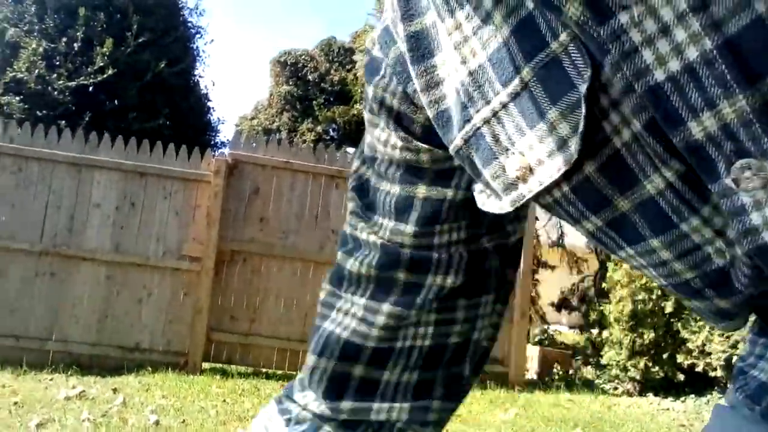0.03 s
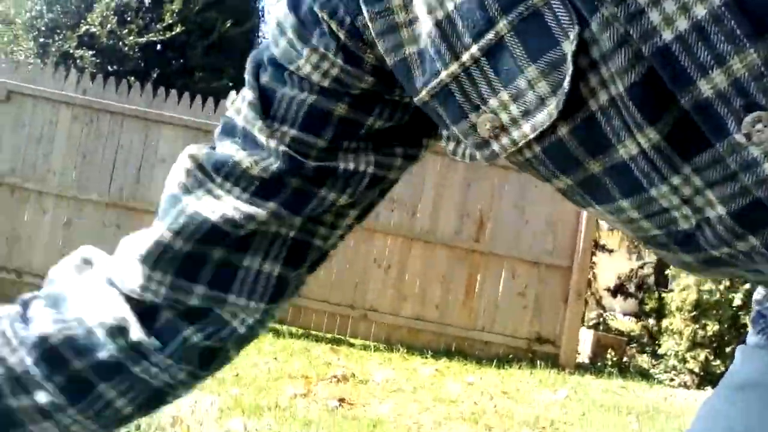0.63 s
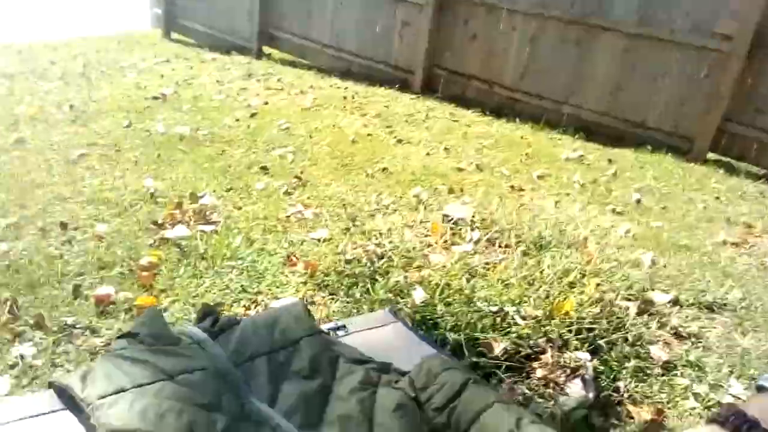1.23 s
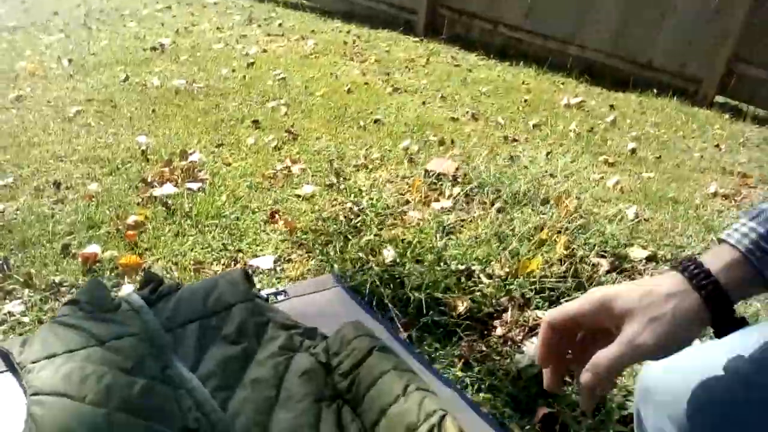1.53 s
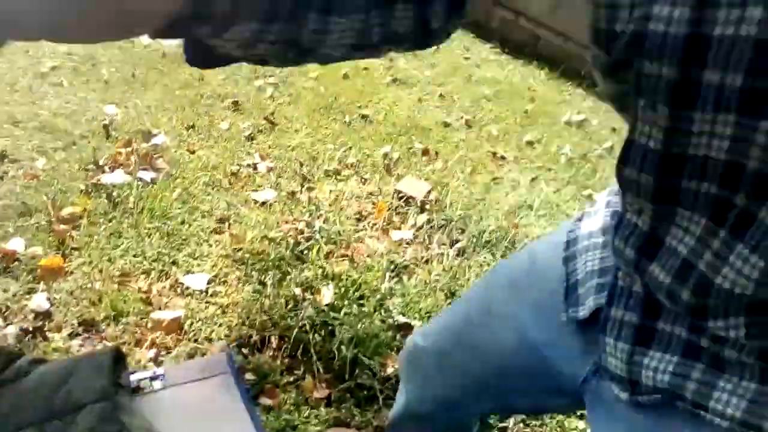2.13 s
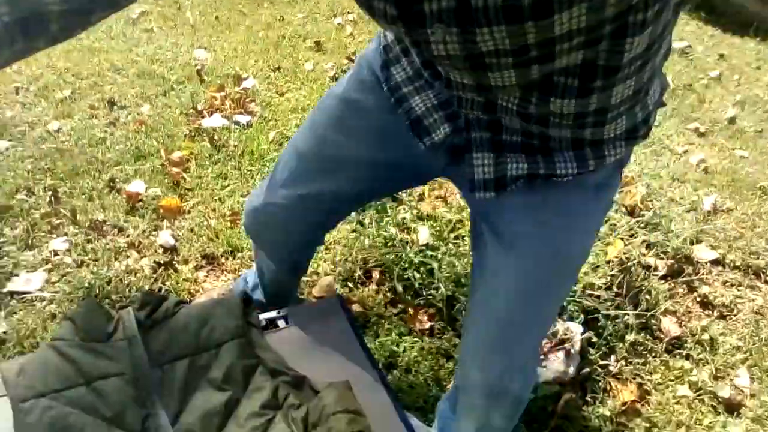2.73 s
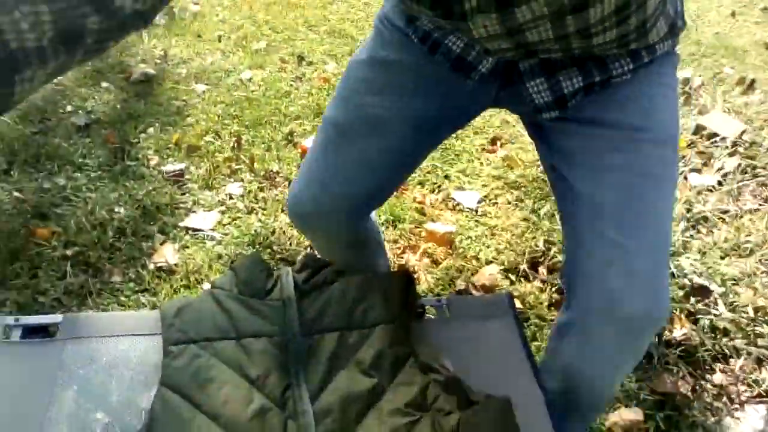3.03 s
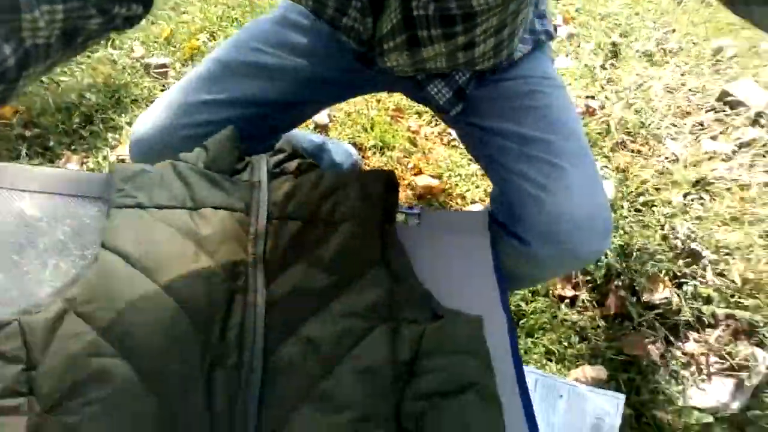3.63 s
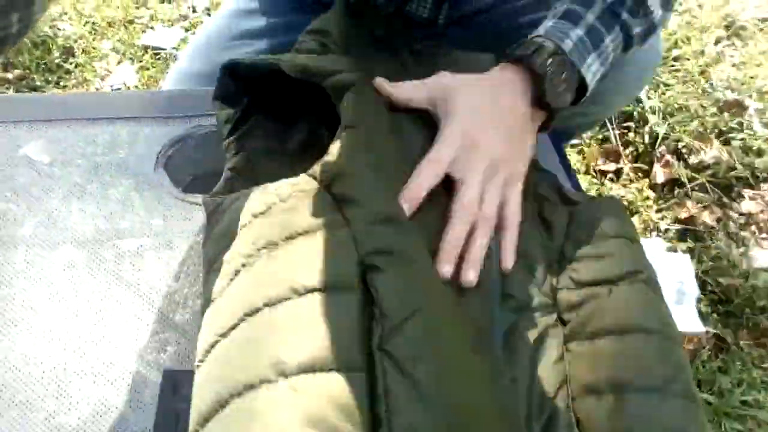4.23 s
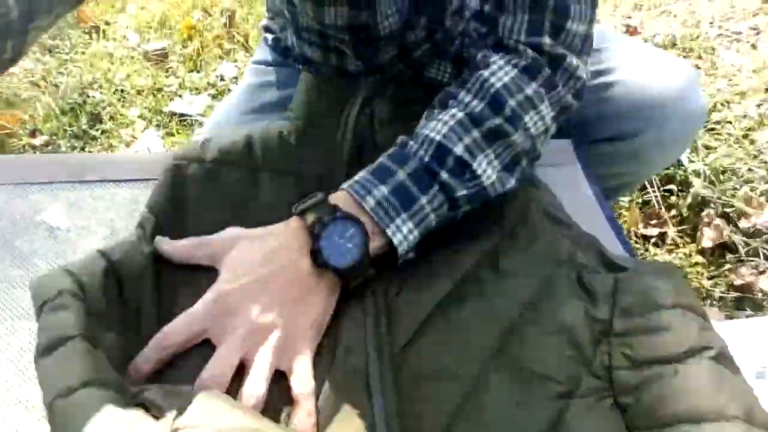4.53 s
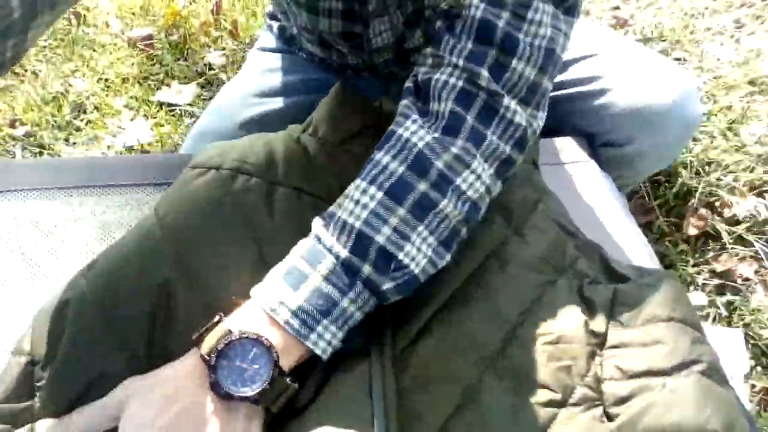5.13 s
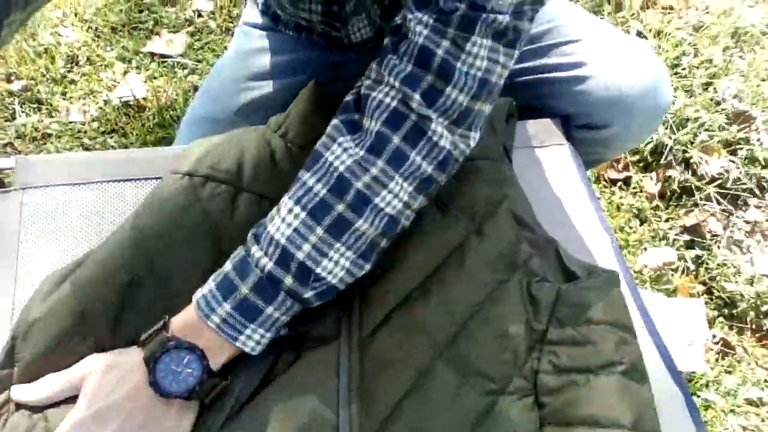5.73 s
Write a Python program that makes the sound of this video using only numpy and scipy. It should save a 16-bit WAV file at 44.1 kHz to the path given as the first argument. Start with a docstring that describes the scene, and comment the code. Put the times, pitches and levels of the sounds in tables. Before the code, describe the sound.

On a lawn, a fine hiss grows over a low neighbourhood rumble while light wind bumps a small microphone. A padded nylon vest gives short, close rustles and a few ticks. Halfway through, the sound dips briefly around one sharp tick, then the wind starts buffeting hard. Under the gusts, hands spread and smooth the vest, and the cloth hisses and crackles.

```python
"""On a lawn, with a small microphone out in the wind. At first, a fine hiss grows over the low noise of
the neighbourhood and light eddies bump the microphone; close by, a padded nylon vest gives short rustles
and a few sharp ticks. About three seconds in, the level dips briefly around the loudest tick and the
wind starts to buffet hard. From there on, hands spread the vest and smooth it flat, so that the cloth
hisses and crackles, while the strongest gusts drive the limiter, which ducks the hiss."""
import sys
import numpy as np
from scipy import signal
from scipy.fft import rfft, irfft, next_fast_len
from scipy.io import wavfile
from scipy.ndimage import uniform_filter1d, minimum_filter1d, map_coordinates

SR = 44100
rng = np.random.default_rng(int(sys.argv[2]) if len(sys.argv) > 2 else 0)


def unload_audio(sound):
    """Save the sound as a 16-bit wav file, at the path given as the first command line argument."""
    columns = np.transpose(np.atleast_2d(sound))
    # keep every value between -1 and 1, then stretch to whole-number steps
    steps = np.round(np.clip(columns, -1, 1) * 32767)
    wavfile.write(sys.argv[1], SR, steps.astype(np.int16))


N = 259749
TIME = np.arange(N) / SR

# The crisp spectrum of the background fizz and of flicked cloth. Each row: frequency in Hz, gain in dB.
CRISP_SPECTRUM = [(1000, 5.5), (4000, -3), (7000, -13), (10000, 2.5), (12500, 0), (15500, -2.5)]


def from_db(db):
    """Decibels to gain."""
    return 10 ** (np.asarray(db) / 20)


def unit(x):
    """Scales to rms 1."""
    return x / np.sqrt(np.mean(x ** 2) + 1e-20)


def follow(rows):
    """A curve of (seconds, value) rows, read at every sample."""
    return np.interp(TIME, *np.transpose(rows))


def add(mix, start_s, sound):
    """Mixes a sound in at start_s."""
    part = mix[max(round(start_s * SR), 0):][:len(sound)]
    part += sound[:len(part)]


def colour(x, spectrum):
    """Filters by (Hz, dB) points joined on a log-frequency axis."""
    hz, db = np.transpose(spectrum)
    size = next_fast_len(len(x))
    bins = np.fft.rfftfreq(size, 1 / SR)
    gain = from_db(np.interp(np.log(bins + 1), np.log(hz), db))
    return irfft(rfft(x, size) * gain, size)[:len(x)]


def wander(rate_hz):
    """A smooth random drift of rms 1, mostly slower than rate_hz."""
    size = next_fast_len(N)
    rolloff = np.exp(-(np.fft.rfftfreq(size, 1 / SR) / rate_hz) ** 2)
    return unit(irfft(rfft(rng.standard_normal(size)) * rolloff)[:N])


def crackle(spectrum, per_s, spread_db):
    """Countless tiny snaps, most small and a few large, coloured by a spectrum, at rms 1."""
    sizes = from_db(spread_db * np.minimum(rng.exponential(1, N), 5))
    snaps = sizes * rng.standard_normal(N) * (rng.random(N) < per_s / SR)
    return unit(colour(snaps, spectrum))


def background_hiss(flutter_db=0.14, fizz_db=-51.5, fizz_growth=1.5):
    """A fine background hiss that grows louder and brighter towards three seconds, then eases."""
    # The rise and fall of the hiss. Each row: time in seconds, relative level in dB.
    hiss_levels = [(0, -53), (.8, -52.5), (1.75, -48.5), (2.2, -45.5), (2.93, -43), (3.1, -45.5),
                   (4.2, -51), (5.89, -49.5)]
    # The tone of the hiss. Each row: frequency in Hz, gain in dB.
    hiss_spectrum = [(60, -13), (170, 5.5), (400, 2), (800, -2), (1500, -0.5), (2000, -4.5), (4000, -6),
                     (6500, -13.5), (8000, -14.5), (13000, -19), (15500, -11.5)]
    level_db = follow(hiss_levels)
    hiss = crackle(hiss_spectrum, per_s=16000, spread_db=1.3)
    hiss *= from_db(level_db + 5 + flutter_db * wander(25))
    fizz = crackle(CRISP_SPECTRUM, per_s=3000, spread_db=2.4)
    fizz *= from_db(fizz_db + fizz_growth * (level_db - level_db.max()))
    return hiss + fizz


def neighbourhood(level_db=-46):
    """The low, even noise of the neighbourhood beyond the lawn."""
    # The tone of the background. Each row: frequency in Hz, gain in dB.
    spectrum = [(25, -24), (60, 13), (130, 11.5), (400, -5.5), (700, -3.5), (950, -3.5), (1400, -28),
                (2200, -27), (9000, -41)]
    return from_db(level_db) * unit(colour(rng.standard_normal(N), spectrum))


def eddy_field(size=2 ** 18, points_per_eddy=32):
    """Pressure along a stretch of turbulent air; smaller whirls are exponentially weaker."""
    whirls_per_eddy = np.fft.rfftfreq(size) * points_per_eddy
    return unit(irfft(rfft(rng.standard_normal(size)) * np.exp(-whirls_per_eddy)))


def airflow(force_db, calm_hz=72, brisk_hz=145, brisk_db=-20, octave_db=6.5, overload=0.76):
    """Level and eddy rate for a force of wind: light air gets louder, brisk air mostly gets brighter."""
    over_db = force_db - brisk_db
    level_db = force_db - overload * np.maximum(over_db, 0)
    eddy_hz = np.maximum(calm_hz, brisk_hz * 2 ** (over_db / octave_db))
    return level_db, eddy_hz


def blow(field, eddy_hz, port_hz=95, points_per_eddy=32):
    """Carries the eddies past the microphone, whose port passes little of the deepest pressure swings."""
    lead = SR // 20  # the air is already moving
    eddy_hz = np.concatenate([np.full(lead, eddy_hz[0]), eddy_hz])
    place = rng.random() * len(field) + points_per_eddy * np.cumsum(eddy_hz) / SR
    pressure = map_coordinates(field, [place % (len(field) - 1)], order=1)
    port = signal.butter(3, port_hz, "highpass", fs=SR, output="sos")
    return signal.sosfilt(port, pressure)[lead:]


def wind(field, fitful=.22, surge_db=0.75, even_s=0.031, lumpy_db=1.5, lumps_hz=14):
    """Buffeting right on the microphone: the air speed jumps about; fast moments are louder, brighter."""
    # The air flow at the microphone. Each row: time in seconds, force in dB.
    flow = [(0, -65), (.3, -52), (.66, -53), (.78, -41), (1.05, -48), (1.42, -29.5), (1.7, -55.5),
            (2.3, -34.5), (2.96, -29.5), (3.02, -19.5), (3.21, -17), (3.36, -10), (3.6, -9), (3.78, -20),
            (4.03, -15), (4.25, -22), (4.48, -14), (4.57, -23), (4.78, -19), (5.3, -20.5), (5.78, -20),
            (5.88, -32)]
    level_db, eddy_hz = airflow(follow(flow) + lumpy_db * wander(lumps_hz))
    surge = wander(88.76)
    pressure = blow(field, eddy_hz * np.exp(fitful * (surge - 1))) * from_db(surge_db * surge)
    power = uniform_filter1d(pressure ** 2, int(even_s * SR))
    evened = pressure / np.sqrt(abs(power) + 1e-9)
    return evened * from_db(level_db)


def rustles(attack_s=0.00042):
    """Soft scuffs of cloth and grass: each a short burst of noise around one resonance."""
    # Each row: start in seconds, relative level in dB, decay time in seconds, resonance in Hz.
    scuffs = [(0.063, -34.5, 0.0058, 1090), (.087, -38, 0.0072, 1330), (.602, -41, .011, 1200),
              (.893, -36, .012, 1370), (0.928, -40, 0.011, 1820), (1.012, -42, 0.011, 1920),
              (1.039, -45, .008, 3740), (1.318, -33, .0086, 337), (1.434, -44, .011, 1090),
              (1.605, -38.5, .008, 3200), (2.93, -41, .013, 1550)]
    out, t = np.zeros(N), np.arange(SR // 8) / SR
    for start_s, db, decay_s, hz in scuffs:
        band = [(hz / 4, -23), (hz / 1.44, -13), (hz, 0), (hz * 1.18, -13), (hz * 4, -23), (hz * 12, -35)]
        noise = unit(colour(rng.standard_normal(len(t)), band))
        envelope = np.exp(-t / decay_s) * (1 - np.exp(-t / attack_s))
        add(out, start_s, from_db(db - 2.5) * noise * envelope)
    return out


def swishes():
    """A fast flick of the cloth gives a brief, crisp spray of snaps."""
    # Each row: midpoint in seconds, length in seconds, relative level in dB.
    flicks = [(0.085, .03, -49), (0.914, 0.045, -45), (1.046, 0.03, -48), (1.306, 0.08, -53),
              (2.662, 0.013, -41), (2.81, 0.042, -49), (3.125, 0.081, -42), (3.629, 0.038, -34.5),
              (3.831, 0.091, -47), (4.291, .05, -51), (4.96, 0.087, -42)]
    envelope = np.zeros(N)
    for middle_s, length_s, db in flicks:
        add(envelope, middle_s - length_s / 2, from_db(db) * np.hanning(int(length_s * SR)))
    return envelope * crackle(CRISP_SPECTRUM, per_s=4000, spread_db=4.0)


def gusts(field, boost_db=1.5, edge_speed=.5, stretch=1.7, ragged=.22, port_limit=4.4):
    """Single eddies hit the microphone, speeding the air up: a thump opens into a ragged splutter."""
    # Each row: midpoint in seconds, length in seconds before stretching, force in dB.
    eddies = [(.267, .026, -46), (0.315, 0.024, -36.5), (.418, 0.023, -33), (0.491, 0.027, -38),
              (.874, 0.02, -31.5), (0.946, 0.028, -35), (1.044, .03, -33.5), (1.172, 0.025, -33.5),
              (1.28, .032, -29), (1.322, 0.024, -32), (1.492, .028, -31.5), (2.119, .028, -40),
              (2.286, 0.026, -27), (2.69, 0.026, -29), (2.775, 0.024, -27), (2.936, 0.023, -25),
              (3.089, .012, -12.5), (3.133, .01, -15.5), (3.196, 0.0086, -14), (3.264, .014, -10.5),
              (3.325, .022, -11), (3.383, 0.045, -4.5), (3.5, 0.041, -6.5), (3.549, 0.042, -2.5),
              (3.59, .024, -4.5), (3.677, .008, -9), (3.736, .011, -13.5), (3.916, 0.051, -17),
              (4.06, 0.0161, -12.5), (4.111, .01, -14), (4.142, .008, -7.5), (4.206, 0.0082, -6.5),
              (4.32, .008, -15), (4.465, .038, -10), (4.521, .026, -8), (4.618, .022, -10),
              (4.822, 0.021, -6), (4.995, .028, -15.5), (5.155, .028, -15), (5.188, .012, -16),
              (5.213, 0.0082, -13), (5.431, .02, -14), (5.623, .011, -13.5), (5.727, .016, -12),
              (5.746, .01, -10)]
    # The tone of the splutter. Each row: frequency in Hz, gain in dB.
    spectrum = [(25, -25), (50, -7), (100, -1.0), (350, 1.0), (700, -1.0), (1400, -0.5), (2800, -0.5),
                (5000, -9), (9000, -26)]
    out, jitter = np.zeros(N), wander(219.2)
    for middle_s, length_s, force_db in eddies:
        level_db, eddy_hz = airflow(force_db)
        swell = signal.windows.tukey(int(stretch * length_s * SR), .7)
        jolt = np.exp(ragged * (jitter[int(middle_s * SR):][:len(swell)] - 1))
        speed = edge_speed + (1 - edge_speed) * swell
        pressure = unit(blow(field, eddy_hz * jolt * speed) * jolt)
        pressure = np.tanh(pressure / port_limit) * swell  # the narrow port rounds off the largest swings
        add(out, middle_s - len(swell) / SR / 2, unit(pressure) * from_db(level_db + boost_db))
    return colour(out, spectrum)


def ticks(snap_s=0.00034, ring_share=0.21, ring_s=0.00046):
    """Tiny hard contacts, about a millisecond long: a snap of treble and a very short ring."""
    # Each row: time in seconds, relative level in dB, ring frequency in Hz.
    contacts = [(.556, -31, 11800), (2.664, -37, 11000), (2.9652, -1.5, 7500), (2.9873, -23, 9000),
                (3.172, -28, 10500), (3.432, -22, 10500), (3.4604, -8, 3930), (3.536, -12, 10400),
                (5.428, -28, 12180), (5.609, -32, 12000)]
    # The tone of the snap. Each row: frequency in Hz, gain in dB.
    snap_spectrum = [(500, -25), (2500, -12), (4000, -21), (7000, 3), (10500, 19), (12500, 10), (15500, 11)]
    out = np.zeros(N)
    t = np.arange(SR // 50) / SR - .005  # zero at the moment of contact
    for contact_s, db, hz in contacts:
        snap = colour(rng.standard_normal(len(t)) * np.exp(-abs(t) / snap_s), snap_spectrum)
        ring = (t > 0) * np.sin(2 * np.pi * hz * t) * np.exp(-abs(t) / ring_s)
        tick = unit(unit(snap) + ring_share * unit(ring))
        add(out, contact_s + t[0], from_db(db - 20) * tick)
    return out


def level_dip():
    """A gain that holds steady except for one brief dip, about three seconds in."""
    # Each row: time in seconds, gain in dB.
    gain_curve = [(2.947, 5.5), (2.953, -11.5), (2.972, -3), (2.993, -2.5), (3.015, 5)]
    return from_db(follow(gain_curve))


def nylon(catch_db=0.5, resting_db=-44, taper=.85):
    """The vest's weave slips in a dense stream of snaps, catching unevenly under the hands."""
    # Palms and sleeves slide. Each row: midpoint in seconds, length in seconds, relative level in dB.
    strokes = [(3.048, 0.14, -45), (3.808, 0.2, -38.5), (4.02, 0.081, -52), (4.269, 0.11, -40.5),
               (4.69, 0.37, -38.5), (4.947, 0.11, -38), (5.28, 0.43, -40), (5.547, 0.22, -43),
               (5.86, 0.17, -38)]
    # The hands settle and keep the vest rustling. Each row: time in seconds, contact from 0 to 1.
    contact = [(3.4, 0.02), (3.7, 1)]
    sliding = np.zeros(N)
    for middle_s, length_s, db in strokes:
        swell = signal.windows.tukey(int(length_s * SR), taper)
        add(sliding, middle_s - length_s / 2, from_db(db) * swell)
    slip = np.hypot(sliding, from_db(resting_db) * follow(contact))
    # The tone of the weave. Each row: frequency in Hz, gain in dB.
    weave_spectrum = [(200, 17.5), (900, -2), (2000, -3), (3500, -0.5), (5000, -3.5), (6500, -8),
                      (8000, -9.5), (15500, -13)]
    snaps = crackle(weave_spectrum, per_s=9000, spread_db=0.99)
    return slip * snaps * from_db(3 + catch_db * wander(24))


def scene():
    """Wind on the microphone, cloth close by, hiss behind; everything but the ticks takes the dip."""
    field = eddy_field()
    cloth = nylon() + swishes() + rustles()
    buffeting = wind(field) + gusts(field)
    background = background_hiss() + neighbourhood()
    return ((buffeting + background + cloth) * level_dip() + ticks())[None]


def record(dry, threshold_db=-7.5, squeeze=0.88, recovery_db_per_s=70, attack_s=0.0055, cutoff_hz=16100):
    """One small microphone, into a limiter that ducks fast and recovers steadily, then a band limit."""
    # The microphone's response. Each row: frequency in Hz, gain in dB.
    mic_response = [(20, -7.5), (6500, 2), (7200, -5), (8100, -14), (10700, -17), (12500, -16.5),
                    (14000, -21), (14800, -5.5), (15500, -9), (16000, -13)]
    mic = colour(dry[0], mic_response)
    duck_db = squeeze * np.maximum(20 * np.log10(abs(mic) + 1e-9) - threshold_db, 0)
    recovery_db = recovery_db_per_s * TIME
    gain_db = recovery_db - np.maximum.accumulate(duck_db + recovery_db)
    width = int(attack_s * SR)
    eased_db = uniform_filter1d(minimum_filter1d(gain_db, width), width)  # down in time for each peak
    limited = mic * from_db(eased_db)
    lowpass = signal.firwin(511, cutoff_hz, window=("kaiser", 9), fs=SR)
    return signal.oaconvolve(limited, lowpass, "same")[None]


dry = scene()
out = record(dry)
unload_audio(out)
```